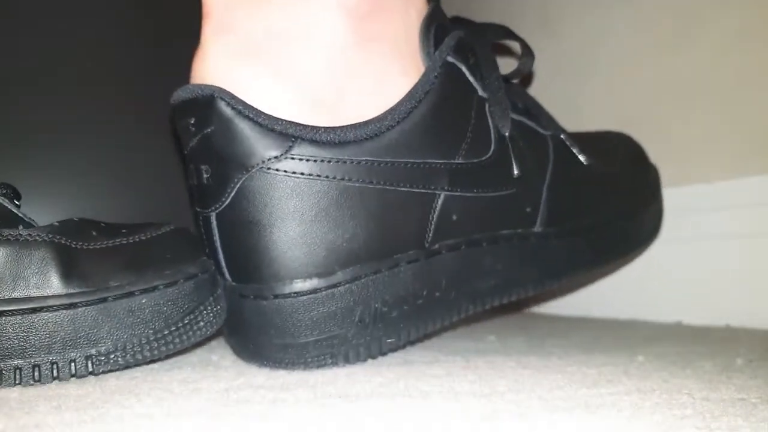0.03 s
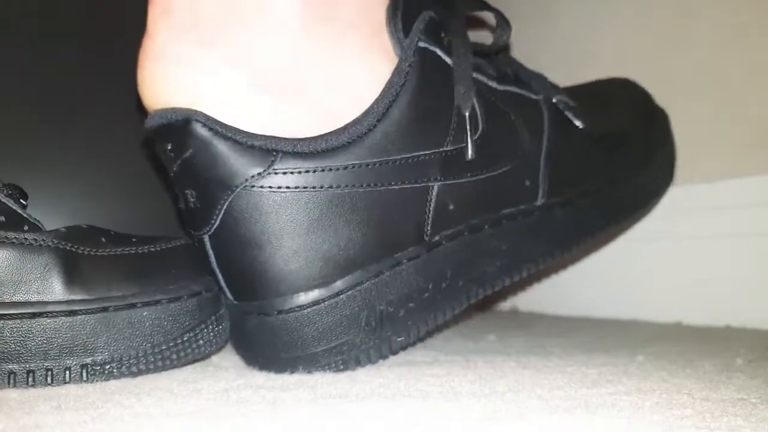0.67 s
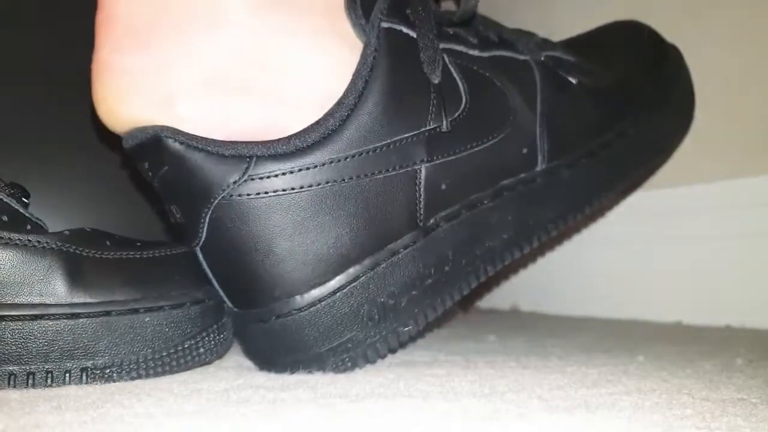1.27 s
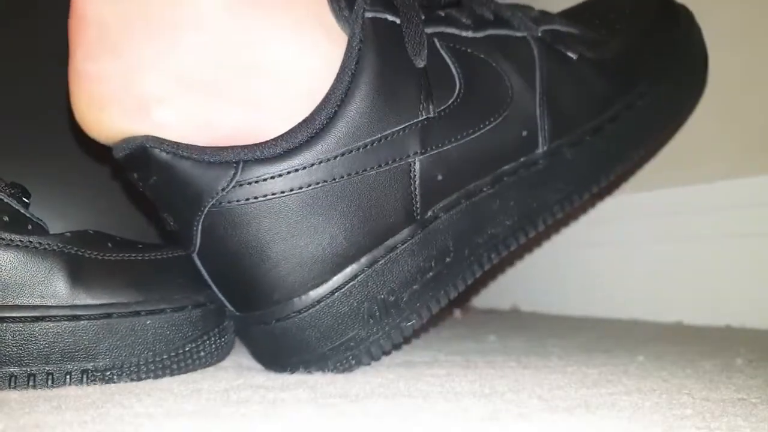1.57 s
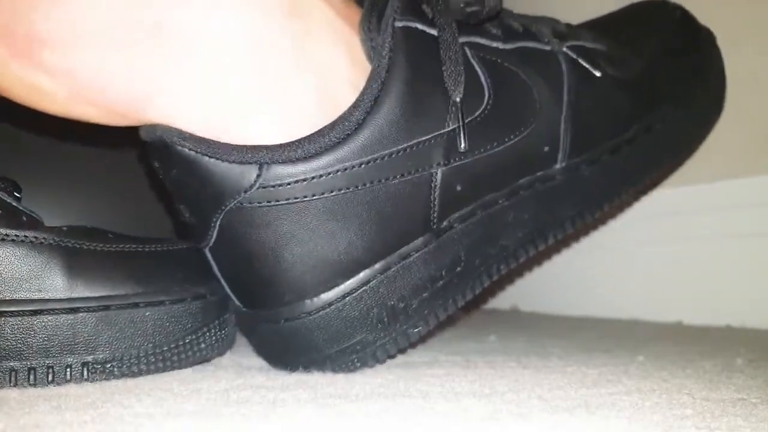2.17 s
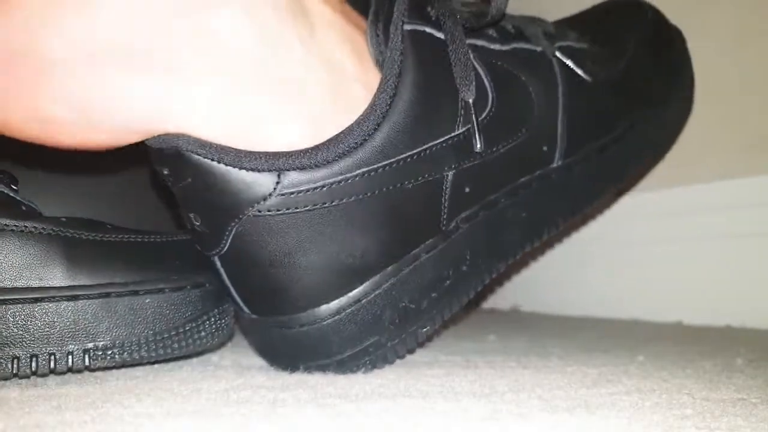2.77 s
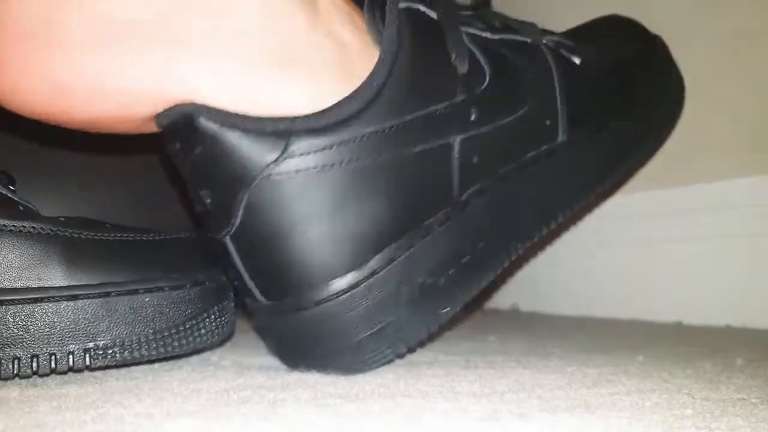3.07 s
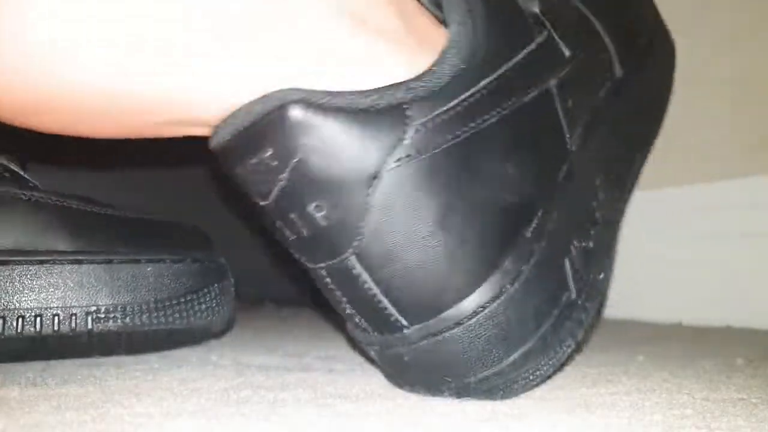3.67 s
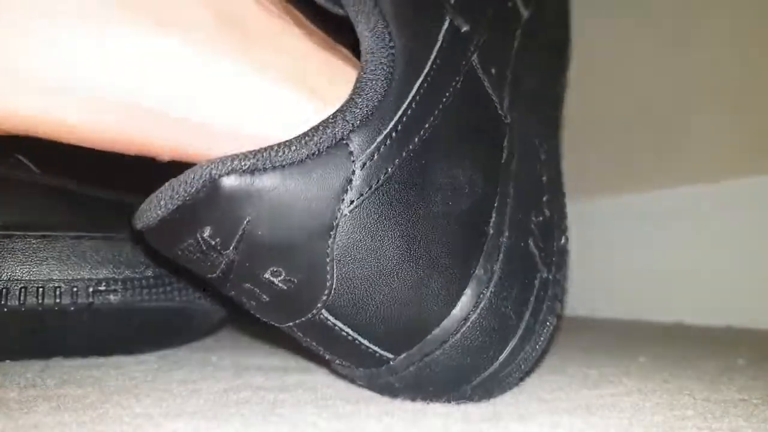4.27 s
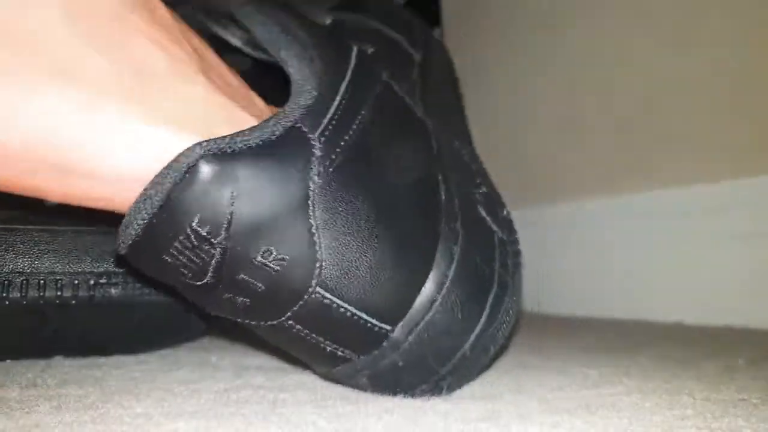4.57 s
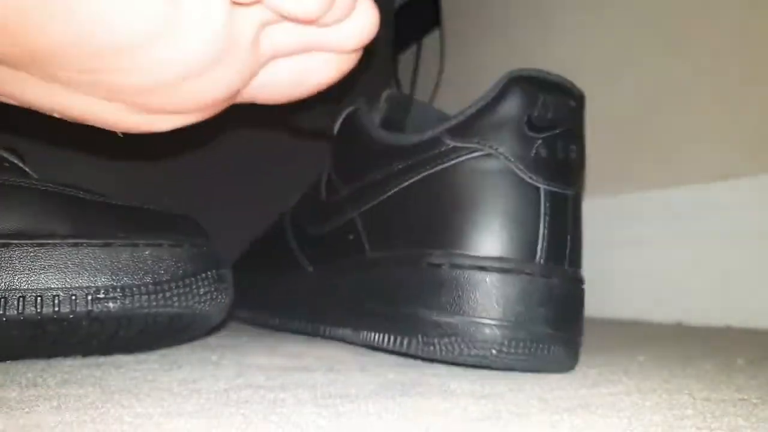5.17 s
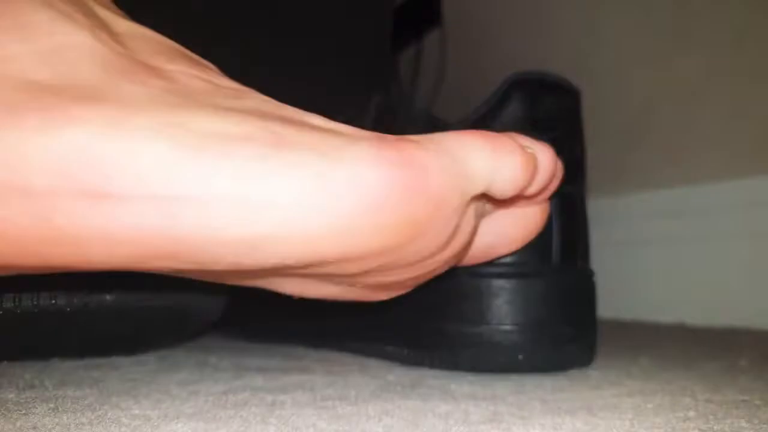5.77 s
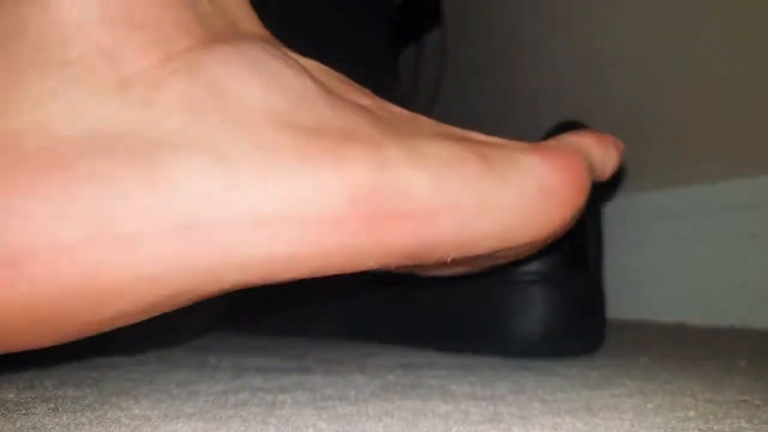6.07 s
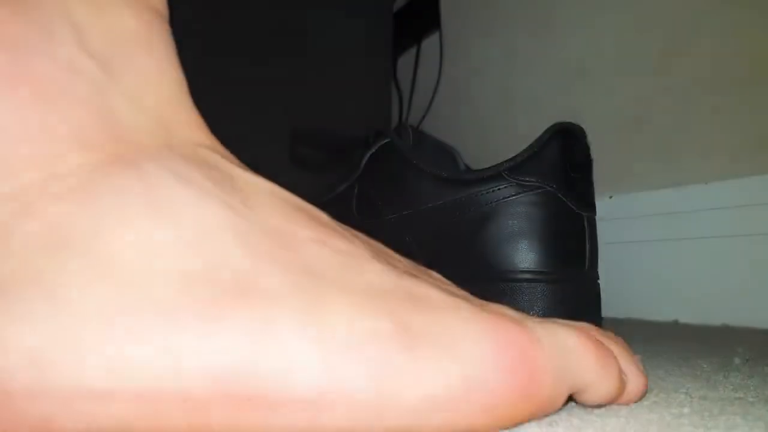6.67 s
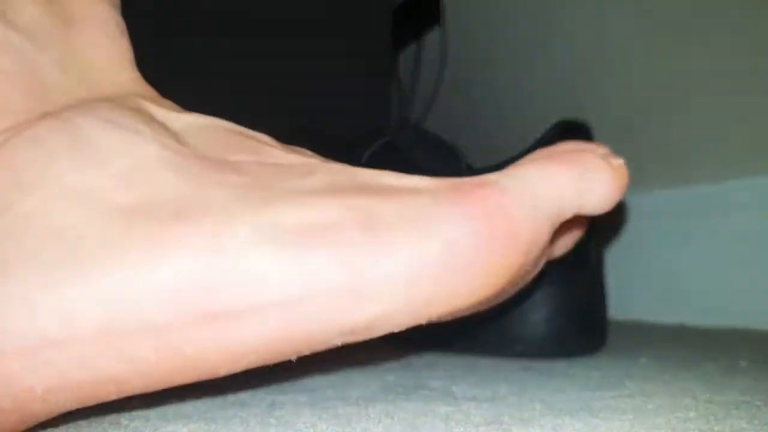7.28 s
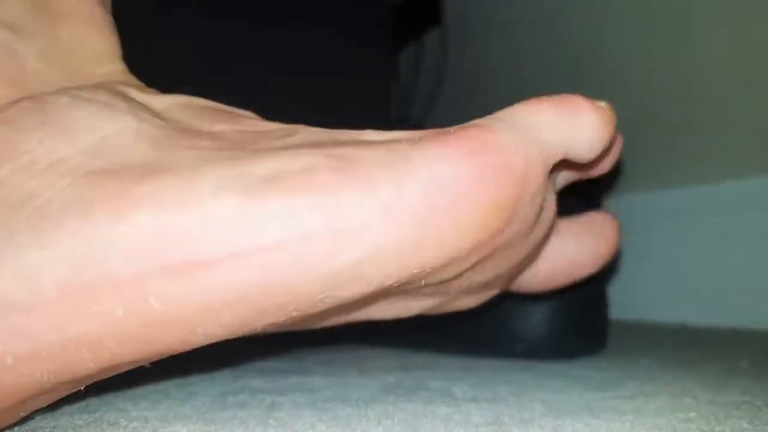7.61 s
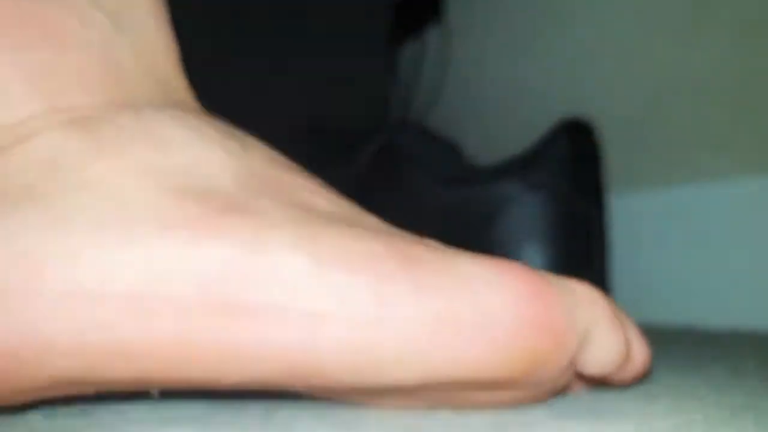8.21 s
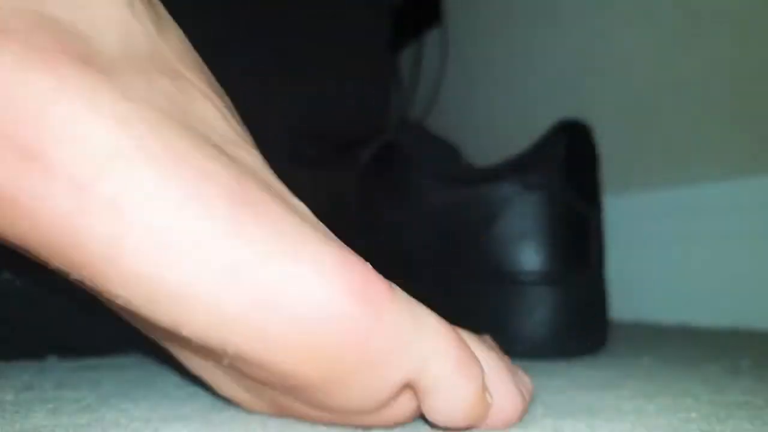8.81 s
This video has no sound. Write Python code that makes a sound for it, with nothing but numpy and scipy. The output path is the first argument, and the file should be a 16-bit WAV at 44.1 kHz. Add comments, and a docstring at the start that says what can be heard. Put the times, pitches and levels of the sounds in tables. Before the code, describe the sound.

Leather sneaker creaks and rubs as it is prised off, then thumps onto carpet, over a steady low indoor hum.

```python
"""Prising off a sneaker

A leather sneaker is prised off against its partner on carpet, close to a microphone on the floor.
Stick-slip friction makes the heel rubber snap and the leather creak. The foot slides out, exciting
the air in the shoe; then shoe and foot thump down and set the small room's low modes booming.
An appliance hums throughout. Automatic gain control ducks on the big thump and later recovers."""
import sys
import numpy as np
from scipy import signal
from scipy.fft import rfft, irfft, next_fast_len
from scipy.io import wavfile
from scipy.ndimage import uniform_filter1d, minimum_filter1d, map_coordinates

SR = 44100
rng = np.random.default_rng(int(sys.argv[2]) if len(sys.argv) > 2 else 0)


def dump(signal):
    """Clip the signal to [-1, 1] and save it as 16-bit WAV at the path in sys.argv[1]."""
    limited = np.clip(np.atleast_2d(signal).T, -1, 1)
    pcm = np.round(limited * 32767).astype(np.int16)
    wavfile.write(sys.argv[1], SR, pcm)


N = 390285

# Spectra of struck and rubbed materials. Each row: frequency in Hz, relative spectral level in dB.
LEATHER = [(150, -14.5), (300, 1), (520, 2), (760, -2.5), (1050, -1), (1260, -6.5), (1600, -6),
           (2300, -11.5), (3300, -24.5), (9000, -59.5)]
CRACKLE = [(1500, -31.5), (3000, -2), (5000, 1.5), (7300, 0.5), (8700, -10.5), (11000, -5.5), (15500, -10)]
CARPET = [(120, -13), (280, 5), (480, 1), (800, -9), (1300, -22), (2500, -35), (6000, -63)]
LINING = [(150, -13.5), (280, 5.5), (560, 0), (800, -2), (1080, -7), (1500, -14.5), (1850, -14),
          (2600, -27.5), (6000, -54.5)]
FIBRES = [(2500, -34), (4200, -10), (6000, -5), (7500, 2.5), (8700, -6), (11500, 3.5), (15500, -1.5)]
HEEL = [(150, -20.5), (260, 2.5), (540, -0.5), (700, -5), (950, -6), (1550, -9.5), (2100, -17.5),
        (3500, -29), (8000, -56.5)]
RUBBER_RASP = [(900, -30), (2200, 4), (3100, 1), (5500, -6.5), (9000, -22)]
# Strokes of sole and lining. Each row: centre in seconds, half length in seconds, level in dB,
# share of the rubbing that is on carpet from 0 to 1.
STROKES = [(1.259, .07, -71.5, .2), (1.483, .025, -63.5, .3), (2.613, 0.045, -67.5, 1),
           (2.988, 0.053, -67, 0.3), (3.127, 0.02, -51, 0.02), (3.553, 0.02, -63.5, 0),
           (3.724, 0.028, -58.5, 0.96), (3.966, 0.029, -50.5, .75), (4.286, 0.024, -54, .65),
           (4.356, 0.031, -58, .6), (4.451, 0.025, -54.5, .6), (4.645, 0.017, -54, .7),
           (4.703, 0.017, -43, 1), (4.829, .035, -58.5, .7), (5.583, .013, -67, 0.7),
           (7.103, .02, -67.5, .7)]

SOLE_HZ, SOLE_T60_S = 258, .022  # the rubber sole's damped mode
PULL_DB, PULL_RANGE_DB = -47, 20  # collar friction at full speed, and its rise from rest


def amp(db):
    """Decibels to amplitude ratio."""
    return 10 ** (np.asarray(db) / 20)


def unit(x):
    """Normalise to an rms of 1."""
    return x / np.sqrt(np.mean(x ** 2) + 1e-20)


def along(points, hz):
    """Interpolate (Hz, value) points on a logarithmic frequency axis."""
    freqs, values = np.transpose(points)
    return np.interp(np.log(hz + 1), np.log(freqs + 1), values)


def wobble(rate):
    """Smooth random modulation: a spline through rate knots a second."""
    knots = rng.standard_normal(int(N * rate / SR) + 4)
    return map_coordinates(knots, [np.arange(N) * rate / SR])


def add(track, s, sound):
    """Superpose a sound on a track at s seconds."""
    part = track[..., round(s * SR):][..., :sound.shape[-1]]
    part += sound[..., :part.shape[-1]]


def coloured(pair, spectrum, coherence=None, balance=None):
    """A minimum-phase filter shapes two independent signals, mixed to partly coherent stereo."""
    # Each row: frequency in Hz, left-right coherence from 0 to 1.
    usual_coherence = [(130, 0.96), (300, .91), (500, 0.87), (1500, 0.42), (3500, 0.055), (8000, 0.06)]
    # Each row: frequency in Hz, left minus right level in dB.
    usual_balance = [(150, 0), (500, 1), (1400, -7), (3500, -1)]
    size = 2 * next_fast_len(pair.shape[-1] // 2 + 4096)
    hz = np.fft.rfftfreq(size, 1 / SR)
    magnitude = unit(amp(along(spectrum, hz)))
    cepstrum = irfft(np.log(magnitude + 1e-6))
    cepstrum[1:size // 2] *= 2  # folding the cepstrum makes the filter causal
    cepstrum[size // 2 + 1:] = 0
    angle = np.arccos(np.clip(along(coherence or usual_coherence, hz), -1, 1)) / 2
    mid, side = rfft(pair, size) * np.exp(rfft(cepstrum)) * [np.cos(angle), np.sin(angle)]
    tilt = amp(along(balance or usual_balance, hz) / 2)
    return irfft([(mid + side) * tilt, (mid - side) / tilt], size)[:, :pair.shape[-1]]


def grains(rate, rough_db):
    """Friction noise: tiny random catches modulate its amplitude."""
    return unit(rng.standard_normal((2, N)) * amp(rough_db * wobble(rate)))


def burst(t60, attack):
    """Impact noise with exponential rise and decay, both timed in seconds."""
    t = np.arange(SR // 4) / SR
    return rng.standard_normal((2, len(t))) * amp(-60 * t / t60) * (1 - np.exp(-t / attack))


def movement(start, attack, hold, release):
    """Trapezoidal speed profile from 0 to 1, timed in seconds."""
    return np.interp(np.arange(N) / SR, start + np.cumsum([0, attack, hold, release]), [0, 1, 1, 0])


def stroke(centre_s, half_s):
    """Bell-shaped envelope of one rubbing stroke."""
    return (1 + ((np.arange(N) / SR - centre_s) / (2 * half_s)) ** 2) ** -2


def pull(db, range_db):
    """Friction envelope: the level rises with the speed of the foot leaving the shoe."""
    speed = movement(start=4.822, attack=.112, hold=.135, release=.026)
    return amp(db - range_db * (1 - speed)) * np.minimum(1, 10 * speed)


def background():
    """Mains hum and motor drone are wavering tones over broadband room rumble and microphone hiss."""
    # Each row: frequency in Hz, level in dB, fluctuation in dB.
    hum_tones = [(99.7, -50.8, 2.5), (199.83, -42.5, 0.41)]
    # Noise spectra. Each row: frequency in Hz, relative spectral level in dB.
    rumble_spectrum = [(20, -9.5), (42, -10), (60, -3), (70, -2), (83, 2.5), (97, -5.5), (115, -6.5),
                       (133, 2.5), (155, -9), (290, -14.5), (400, -23), (600, -35.5), (1000, -44.5),
                       (2000, -48), (4000, -59.5)]
    hiss_spectrum = [(300, -8), (1500, 4.5), (3000, 1.5), (5500, -4), (7500, -10), (8700, -15),
                     (11500, -0.5), (15500, 0.5)]
    t = np.arange(N) / SR - np.array([[.00024], [0]])  # the hum reaches the left channel later
    hum = 0
    for hz, db, waver_db in hum_tones:
        peak = np.sqrt(2) * amp(db + waver_db * wobble(12))
        hum += peak * np.sin(2 * np.pi * hz * t + waver_db / 6 * wobble(21))
    rumble = coloured(rng.standard_normal((2, N)), rumble_spectrum, balance=[(100, -1.5)])
    hiss = coloured(rng.standard_normal((2, N)), hiss_spectrum,
                    coherence=[(1000, 0)], balance=[(1000, -.5)])
    return hum * amp([[-.55], [.35]]) + amp(-52.5) * rumble + amp(-76.5) * hiss


def rustles():
    """Faint friction noise comes and goes as the leather strains and weight shifts on the carpet."""
    strain = movement(start=0, attack=.1, hold=5.5, release=1.5) * amp(-83.5 + 4 * wobble(11))
    shifting = amp(-75 + 4 * wobble(11))
    leather = coloured(strain * grains(rate=160, rough_db=3), LEATHER)
    return leather + coloured(shifting * rng.standard_normal((2, N)), CARPET)


def slips():
    """Static friction gives way: rubber snaps free, crackles and excites sole and leather."""
    # Each row: release time in seconds, level in dB, relative level of the sole's knock in dB.
    releases = [(0.057, -33.5, -2), (0.08, -29, -4), (0.119, -33.5, -1), (0.145, -28, -8), (0.154, -39, 7),
                (0.269, -35.5, 1), (0.34, -37.5, 1), (0.359, -34, -3.5), (0.671, -32, 6), (3.576, -52.5, 5),
                (5.038, -37.5, 7), (5.057, -37, -5)]
    snap, crackle, knock = np.zeros((3, 2, N))
    t = np.arange(SR // 8) / SR
    for s, db, knock_db in releases:
        # a very short swell softens the start of each snap
        lead_in = burst(t60=.03, attack=.0003)[:, :SR // 32][:, ::-1]
        add(snap, s - 1 / 32, amp(db - 18.5) * lead_in)
        add(crackle, s - 1 / 32, amp(db - 31) * lead_in)
        add(snap, s, amp(db - 2.3) * burst(t60=.024, attack=.0006))
        add(snap[0], s + .0011, amp(db + 4.5) * np.ones(1))  # an impulse, in phase in both channels
        add(crackle, s, amp(db - 17) * burst(t60=.042, attack=.002))
        sole_hz = SOLE_HZ * np.exp(.12 * rng.standard_normal())
        sole = np.sin(2 * np.pi * sole_hz * t) * amp(-60 * t / SOLE_T60_S)
        add(knock, s + .001, amp(db + knock_db + 4.5) * sole + amp(db) * leather_ring())
    return coloured(snap, LEATHER) + coloured(crackle, CRACKLE) + knock * amp([[-1.5], [1.5]])


def leather_ring(t60=.025, pitch_spread=.036):
    """Damped modes of the stiff upper ring a little differently each time as the strain changes."""
    # Each row: frequency in Hz, level relative to the blow in dB.
    modes = [(760, -14), (1250, -14.5), (1660, -15), (2330, -19)]
    t = np.arange(SR // 8) / SR
    ring = 0
    for hz, db in modes:
        gain = amp(db + 2 * rng.standard_normal((2, 1)))
        strained_hz = hz * (1 + pitch_spread * rng.standard_normal())
        ring += gain * np.sin(2 * np.pi * strained_hz * t)
    return ring * amp(-60 * t / t60)


def thumps():
    """A soft landing forces the floor for two cycles; the modes of floor and room then decay freely."""
    # Each row: start in seconds, level in dB, frequency in Hz, relative gain of the boom in dB.
    landings = [(0.08, -32.5, 103, -3), (3.566, -39.5, 55.6, 5.5), (3.954, -35, 75, 1),
                (5.056, -23.5, 65.5, 6.5), (5.144, -4, 105, 7), (6.095, -20.5, 90, 6.5)]
    # Each row: frequency in Hz, relative level in dB, time to decay by 60 dB in seconds.
    boom_modes = [(49.44, -25.5, 0.93), (58.5, -25, 0.74), (75.5, -22.5, 0.81), (95, -26.5, 0.32),
                  (133.5, -9, 0.2)]
    out, t = np.zeros((2, N)), np.arange(SR) / SR
    boom = 0
    for hz, db, t60 in boom_modes:
        channel_phase = .11 * rng.standard_normal((2, 1))
        boom += amp(db - 60 * t / t60) * np.sin(2 * np.pi * hz * t + channel_phase)
    boom *= 1 - np.exp(-(t / .025) ** 2)
    for s, db, hz, boom_db in landings:
        cycles = hz * t
        push = np.sin(2 * np.pi * cycles) * np.tanh(cycles / .4) * np.exp(-(cycles / 1.85) ** 6)
        add(out, s, amp(db) * (push + amp(boom_db) * boom))
    return out * amp([[.15], [-.15]])


def ticks():
    """Light ticks and small catches of leather, lining and heel excite the upper's modes, not the sole."""
    # Each row: start in seconds, level in dB.
    touches = [(0.623, -49), (0.735, -36), (1.006, -51), (1.417, -44.5), (1.747, -41), (4.665, -37.5),
               (5.272, -50.5), (5.328, -39)]
    blows, ring = np.zeros((2, 2, N))
    for s, db in touches:
        add(blows, s, amp(db - 2.5) * burst(t60=.024, attack=.00065))
        add(blows, s, amp(db - 20) * burst(t60=.13, attack=.011))  # each skids on a little
        add(ring, s, amp(db) * leather_ring())
    return coloured(blows, LEATHER) + amp(-29.5) * coloured(blows, CRACKLE) + ring


def rubbing():
    """Sliding friction: the foot rubs the lining, rubber rasps on the other shoe, carpet fibres hiss."""
    out = np.zeros((2, N))
    lining = coloured(grains(rate=230, rough_db=2), LINING)
    rasp = coloured(grains(rate=580, rough_db=.5), RUBBER_RASP)
    fibres = coloured(grains(rate=240, rough_db=2), FIBRES)
    for s, half_s, db, on_carpet in STROKES:
        rasp_db = -15 - 13 * on_carpet
        fibre_db = -33 + 16 * on_carpet
        out += amp(db) * stroke(s, half_s) * (lining + amp(rasp_db) * rasp + amp(fibre_db) * fibres)
    return out


def taps():
    """The pile cushions light impacts of sole and foot, damping the treble, and crackles on rebound."""
    # Each row: start in seconds, level in dB.
    touches = [(1.417, -41.5), (2.278, -50.5), (2.491, -51.5), (2.83, -48), (3.189, -48), (3.658, -50),
               (4.629, -41), (5.144, -30), (5.198, -39), (5.421, -49), (6.087, -47.5), (7.336, -44.5),
               (8.312, -51.5), (8.699, -49), (8.833, -50)]
    blows, pile = np.zeros((2, 2, N))
    for s, db in touches:
        add(blows, s, amp(db + 3.5) * burst(t60=.065, attack=.0035))
        add(pile, s, amp(db - 22) * burst(t60=.15, attack=.004))
    return coloured(blows, CARPET) + coloured(pile * grains(rate=300, rough_db=3.5), LINING)


def heel_drag(start_s=1.747, end_s=1.884, slow_hz=145, rise_octaves=2.1):
    """Stick-slip oscillation: the heel judders down the other shoe and quickens to a gritty scrape."""
    t = np.arange(N) / SR
    speed = movement(start=1.779, attack=.046, hold=.057, release=.021)
    contact = (t > start_s) * amp(-561 * np.maximum(0, t - end_s))
    slip_hz = slow_hz * 2 ** (rise_octaves * speed) * np.exp(.25 * wobble(150))
    slip_count = np.floor(np.cumsum(slip_hz) / SR)
    pulses = np.diff(slip_count, prepend=0) * np.sqrt(SR / slip_hz) * amp(1.6 * wobble(200))
    # each slip tears for a millisecond or two and knocks the sole
    fade = np.exp(-1 / (.0011 * SR))
    tearing = unit(signal.lfilter([1], [1, -fade], pulses) * rng.standard_normal((2, N)))
    knock = np.sin(2 * np.pi * SOLE_HZ * t) * amp(-60 * t / SOLE_T60_S)
    sole = unit(signal.fftconvolve(pulses, knock[:SR // 2])[:N])
    judder = coloured(tearing, HEEL) + amp(-11) * sole
    grit = amp(-5.5) * coloured(grains(rate=670, rough_db=3), CRACKLE)
    grit += coloured(grains(rate=520, rough_db=.5), FIBRES)
    return contact * (amp(-44 + 4.4 * speed) * judder + amp(-71.5 + 19.5 * speed) * grit)


def cavity(heel_out_s=4.59, unplug_s=4.885, plugged_hz=816, open_hz=1333):
    """Friction drives the shoe's air resonance, which climbs and weakens as the foot unplugs it."""
    t = np.arange(N) / SR
    rubs = sum(amp(db) * stroke(s, half_s) for s, half_s, db, _ in STROKES if heel_out_s < s < unplug_s)
    friction = pull(PULL_DB, PULL_RANGE_DB) + rubs
    opening = (1 + np.tanh((t - unplug_s) / .045)) / 2
    wander = 1 + .06 * wobble(35)  # the foot shifts
    hz = (plugged_hz + (open_hz - plugged_hz) * opening) * wander
    phase = 2 * np.pi * np.cumsum(hz) / SR
    noise_band = unit(wobble(330)) * np.cos(phase) + unit(wobble(330)) * np.sin(phase)
    return friction * amp(-4 - 7 * opening) * noise_band


def foot_slide():
    """Sliding friction: skin hisses over the padded collar, and the toes scrape its edge last."""
    # Each row: frequency in Hz, relative spectral level in dB.
    collar_spectrum = [(150, -22.5), (290, 2), (460, 3.5), (640, -7), (930, -3), (1350, -11.5), (1550, -15),
                       (1850, -9.5), (2350, -21.5), (3050, -15.5), (3800, -35.5), (8000, -62.5)]
    collar = pull(PULL_DB, PULL_RANGE_DB) * coloured(grains(rate=180, rough_db=2.5), collar_spectrum)
    skin = pull(db=-57, range_db=30.5) * coloured(grains(rate=250, rough_db=.5), FIBRES)
    edge = coloured(grains(rate=400, rough_db=3), HEEL)
    edge += amp(-11.5) * coloured(grains(rate=400, rough_db=2), RUBBER_RASP)
    toes = amp(-47.5) * stroke(centre_s=5.057, half_s=.012) * edge
    catching = amp(2.1 * wobble(55))
    return catching * (collar + skin) + toes


def room(x):
    """Diffuse reverberation of a carpeted room: convolution with short noise, coherent in the bass."""
    # Each row: frequency in Hz, reverberation time in seconds.
    decay_times = [(200, 0.26), (1500, .3), (10000, 0.24)]
    hz, t, noise = signal.stft(rng.standard_normal((2, SR // 2)), SR, nperseg=256)
    decay = amp(-60 * t / along(decay_times, hz)[:, None])
    tail = signal.istft(noise * decay, SR, nperseg=256)[1]
    tail = coloured(tail, spectrum=[(0, 0)], balance=[(0, 0)])
    return signal.fftconvolve(x, tail / np.linalg.norm(tail[0]), axes=1)[:, :N]


def scene():
    """Superposition of direct shoe and foot sounds, reverberation and the humming background."""
    contacts = slips() + ticks() + taps() + heel_drag()
    friction = rubbing() + rustles() + foot_slide() + cavity()
    reverb = room(amp(-9.5) * contacts + amp(-11.5) * friction)
    return contacts + friction + reverb + thumps() + background()


def record(dry):
    """Automatic gain control ducks on a peak, holds and recovers; filters then limit the bandwidth."""
    threshold_db, bass_cut_hz, top_hz = -6.8, 45, 15800
    hold, release = int(2.15 * SR), int(.45 * SR)
    peak_db = 20 * np.log10(np.abs(dry).max(axis=0) + 1e-9)
    needed_db = np.minimum(0, threshold_db - peak_db)
    held_db = minimum_filter1d(needed_db, hold, origin=(hold - 1) // 2, mode="constant")
    eased_db = uniform_filter1d(held_db, release, origin=(release - 1) // 2, mode="constant")
    gain_db = uniform_filter1d(np.minimum(held_db, eased_db), size=SR // 50)
    size = next_fast_len(N + SR // 2)
    hz = np.fft.rfftfreq(size, 1 / SR)
    bass_cut = 1 - .9 / (1 + (hz / bass_cut_hz) ** 8)
    return irfft(rfft(dry * amp(gain_db), size) * bass_cut * (hz < top_hz), size)[:, :N]


dry = scene()
out = record(dry)
dump(out)
```